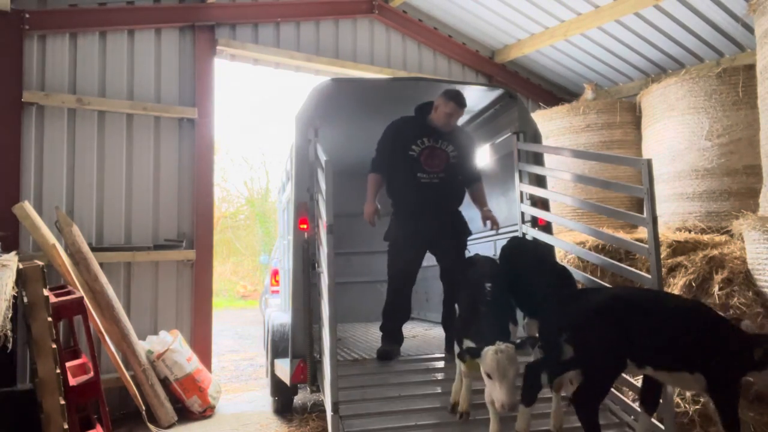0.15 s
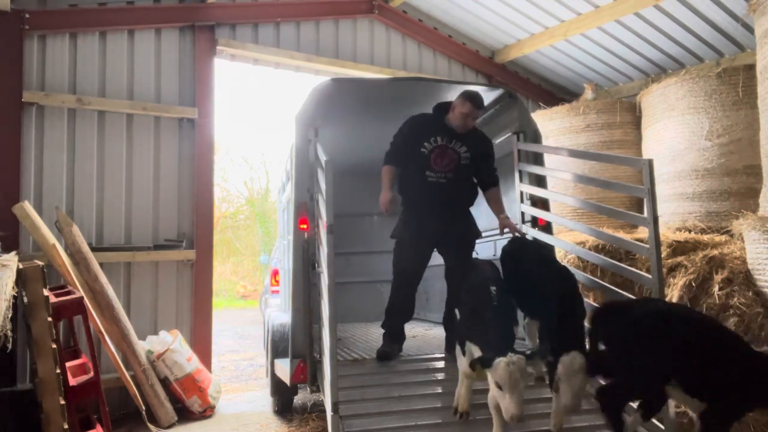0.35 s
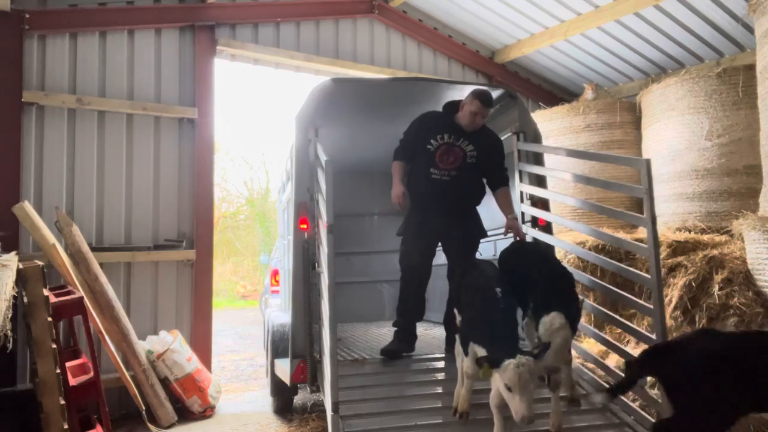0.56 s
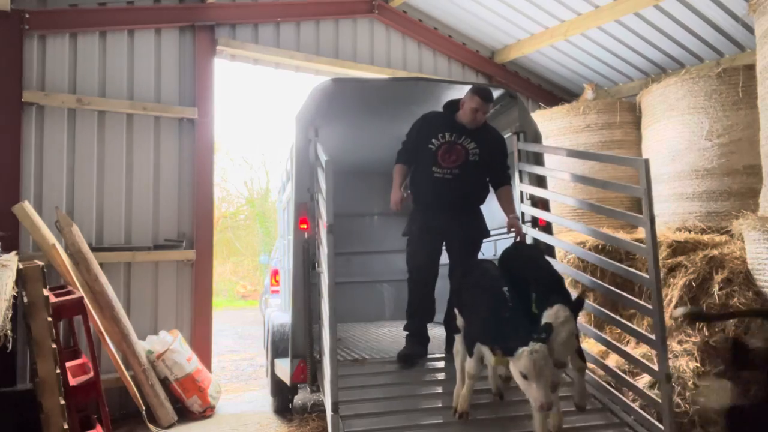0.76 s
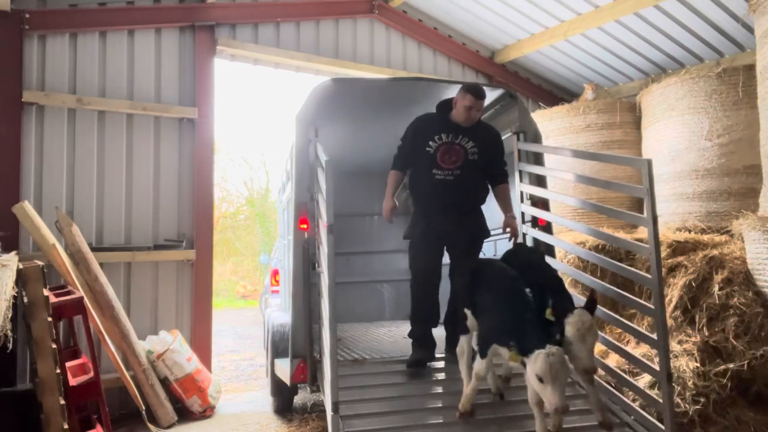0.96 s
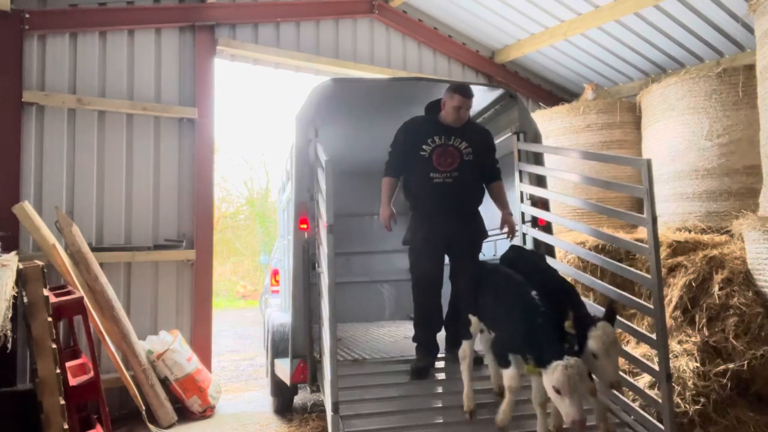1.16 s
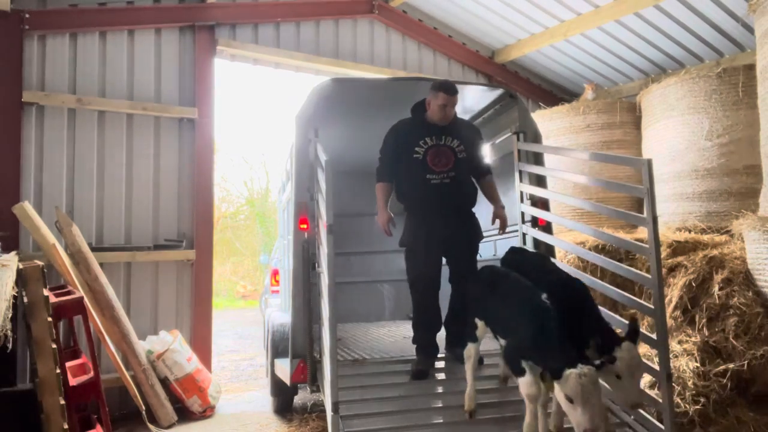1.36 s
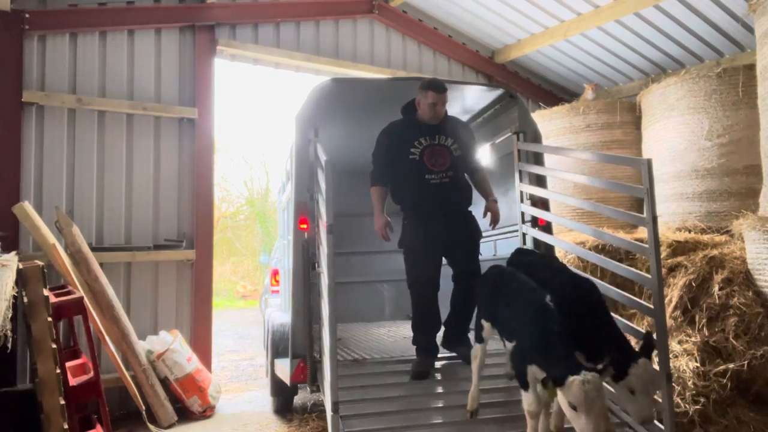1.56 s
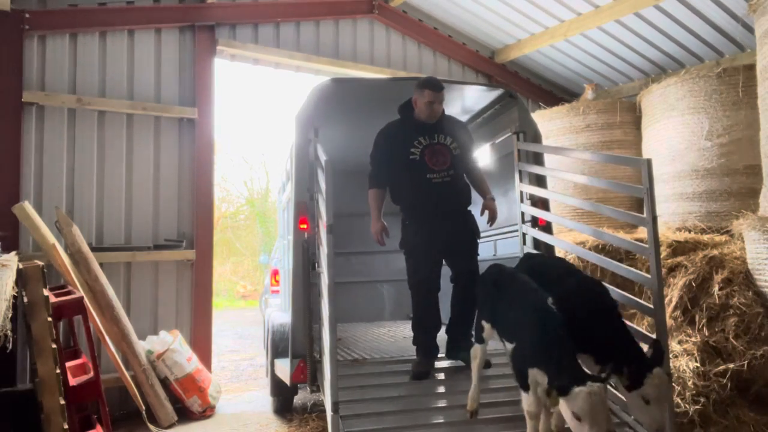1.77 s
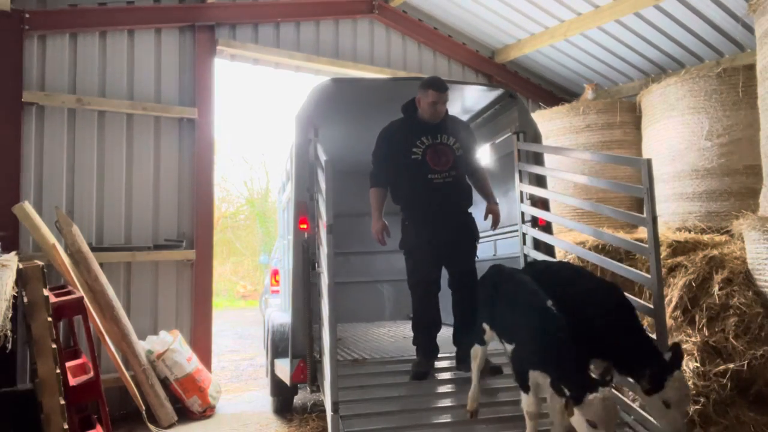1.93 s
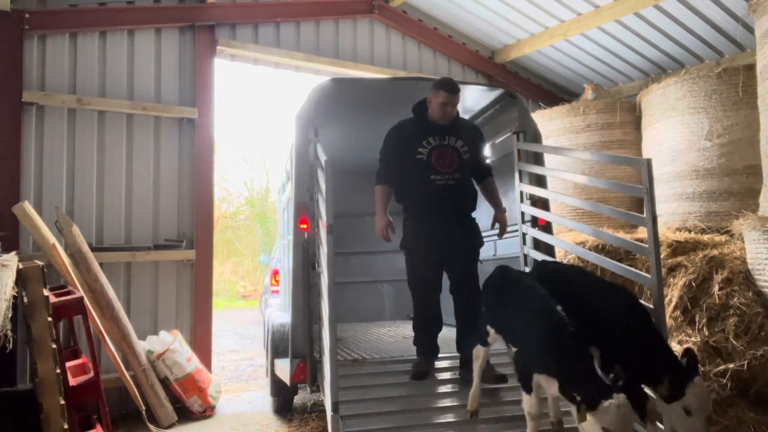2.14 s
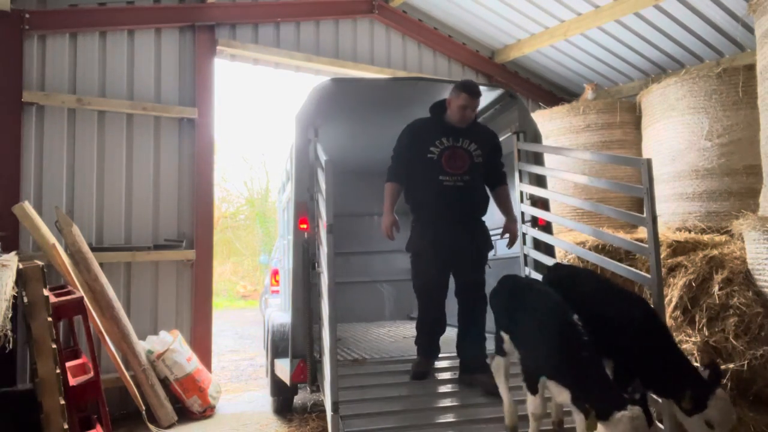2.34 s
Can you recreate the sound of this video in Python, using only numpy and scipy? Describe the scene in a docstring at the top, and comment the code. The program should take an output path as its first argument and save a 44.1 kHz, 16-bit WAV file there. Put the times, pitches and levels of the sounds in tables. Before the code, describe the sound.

Hooves of young cattle thud and scrape down a hollow metal ramp, loose steel clinking

```python
"""At a shed, heard close: calves step down the ribbed metal ramp of a livestock trailer.
Hooves knock as short cracks over ringing modes, skid as showers of tiny slips, snap and screech.
Weight thuds through the deck as low noise and modes, the plate rings, and loose steel ticks and clinks.
The trailer box rumbles and straw swishes as coloured noise, with faint gliding chirps.
Decaying noise tails give the answer of the shed."""
import sys
import numpy as np
from scipy import signal
from scipy.fft import rfft, irfft, next_fast_len
from scipy.io import wavfile
from scipy.ndimage import uniform_filter1d, map_coordinates

SR = 44100
rng = np.random.default_rng(int(sys.argv[2]) if len(sys.argv) > 2 else 0)


def digitize_waveform(pressure):
    """Quantize a signal to 16-bit integers and store it at the path in sys.argv[1].

    Rows of a 2-D input are taken as channels; values are limited to [-1, 1].
    """
    field = np.atleast_2d(pressure).T
    bounded = np.clip(field, -1, 1)
    quanta = np.round(bounded * 32767).astype(np.int16)
    wavfile.write(sys.argv[1], SR, quanta)


N = 110250
T = np.arange(N) / SR  # time in s


def amp(db):
    """Decibels to gain."""
    return 10 ** (np.asarray(db) / 20)


def unit(x):
    """Scale to rms 1."""
    return x / np.sqrt(np.mean(x ** 2) + 1e-20)


def along(points, hz):
    """Read (Hz, value) points on a log frequency axis."""
    f, v = np.transpose(points)
    return np.interp(np.log(hz + 1), np.log(f + 1), v)


def level_curve(points):
    """Gain over time through (s, dB) points."""
    return amp(np.interp(T, *np.transpose(points)))


def filtered(x, response):
    """Multiply the spectrum of x by a function of frequency."""
    m = next_fast_len(N + SR // 4)
    return irfft(rfft(x, m) * response(np.fft.rfftfreq(m, 1 / SR)), m)[..., :N]


def noise(spectrum):
    """Stereo noise of rms 1 with the given colour."""
    white = rng.standard_normal((2, N))
    return unit(filtered(white, lambda f: amp(along(spectrum, f))))


def envelope(rise, hold, t60):
    """Attack, hold and release from time zero, all in seconds."""
    return (1 - np.exp(-T / rise)) * amp(-60 * np.maximum(T - hold, 0) / t60)


def add(track, s, sound, pan_db=0):
    """Mix a sound into a stereo track at time s; positive pan is louder on the left."""
    i = max(round(s * SR), 0)
    placed = amp([[pan_db / 2], [-pan_db / 2]]) * sound
    track[:, i:] += placed[:, :N - i]


def wander(rate_hz):
    """Random curve of rms 1 with a new target rate_hz times a second."""
    return unit(map_coordinates(rng.standard_normal(N), [T * rate_hz], order=1))


def flutter(rate_hz):
    """Random complex gain over half a second that smears a line to about rate_hz wide."""
    knots = rng.standard_normal((2, 4000))
    at = [np.minimum(T[:SR // 2] * rate_hz, 3999)]
    real, imaginary = [unit(map_coordinates(k, at, order=1)) for k in knots]
    return real + 1j * imaginary


def ring(modes, ratio=1, scatter_db=3.0):
    """Damped modes with level and phase a little different at each strike."""
    t = T[:SR // 2]
    out = np.zeros(len(t))
    for hz, db, t60 in modes:
        decay = amp(db + scatter_db * rng.standard_normal() - 60 * t / t60)
        out += decay * np.sin(2 * np.pi * (hz * ratio * t + rng.random()))
    return np.pad(out * (1 - np.exp(-t / 0.00016)), (0, N - len(t)))


def rattle(modes, rough_hz, life=1):
    """Damped modes of a loose part that keeps chattering while it rings."""
    t = T[:SR // 2]
    out = np.zeros(len(t))
    for hz, db, t60 in modes:
        rough_tone = (flutter(rough_hz) * np.exp(2j * np.pi * hz * t)).real
        out += amp(db - 60 * t / (t60 * life)) * rough_tone
    return np.pad(out * (1 - np.exp(-t / 0.002)), (0, N - len(t))) / np.sqrt(2)


def ahead(x, lead_ms):
    """Sound from off centre reaches the left microphone first: a time shift between channels."""
    half_each = np.array([[1], [-1]])
    return filtered(x, lambda f: np.exp(1j * np.pi * f * lead_ms / 1000 * half_each))


def walls(x, count=6):
    """Early copies off the trailer sides give a hollow colour."""
    walls_db, spread_s = -3.5, 0.014
    out = x.copy()
    for u, sign in zip(rng.random(count), rng.choice([-1, 1], count)):
        add(out, 0.002 + u * spread_s, sign * amp(walls_db) / np.sqrt(count) * x)
    return out


def shed(x, wet_db):
    """Add the diffuse answer of the shed, each frequency dying at its own speed."""
    # how long the shed rings: frequency_hz, t60_s
    shed_decay = [(100, 0.78), (400, 0.4), (1200, 0.46), (4000, 0.5), (8000, 0.22), (13000, 0.4)]
    hz, t, z = signal.stft(rng.standard_normal((2, SR * 3 // 4)), SR, nperseg=256)
    decay = amp(-60 * t / along(shed_decay, hz)[:, None])
    tail = signal.istft(z * decay * (1 - np.exp(-t / 0.0021)), SR, nperseg=256)[1]
    echo = signal.fftconvolve(x, tail / np.linalg.norm(tail[0]), axes=1)[:, :N]
    return x + amp(wet_db) * echo


def background():
    """The trailer box rumbles under the shifting weight, as low noise over still air."""
    # colour of the box: frequency_hz, level_db (per Hz)
    box_colour = [(20, -22), (36, -13), (56, -7.5), (73, 5), (92, -10.5), (130, -3), (220, -12.5),
                  (600, -45.5)]
    # rise and fall of the rumble: time_s, level_db
    rumble_level = [(0, -56), (.17, -56), (.33, -55), (.45, -33), (.6, -40), (.72, -32.5), (1.2, -37.5),
                    (1.62, -30), (1.82, -34), (1.95, -32), (2.15, -43), (2.42, -53)]
    # colour of the still air: frequency_hz, level_db (per Hz)
    air_colour = [(15, -29.5), (25, -12), (79, 6.5), (210, -15), (287, 8), (599, -33), (1900, -27.5),
                  (7070, -18), (8270, -11.5), (10200, -18.5), (13300, -20)]
    air_db = -54.5
    return noise(box_colour) * level_curve(rumble_level) + amp(air_db) * noise(air_colour)


def chirps():
    """Thin sine glides with a wavering pitch and a strong echo."""
    # faint chirps: start_s, length_s, start_hz, middle_hz, end_hz, level_db
    chirp_list = [(1.4, 0.024, 4050, 4310, 4470, -44.5), (1.537, 0.024, 3030, 3490, 4500, -44),
                  (1.619, 0.09, 3500, 4230, 3890, -51.5), (1.625, 0.072, 3300, 3620, 3700, -53.5),
                  (1.693, 0.1, 3900, 3130, 2520, -45.5)]
    waver = 0.047  # rms share of the pitch
    out = np.zeros((2, N))
    for s, length, start_hz, middle_hz, end_hz, db in chirp_list:
        u = np.clip(T / length, 0, 1)
        glide = np.polyfit([0, .5, 1], [start_hz, middle_hz, end_hz], 2)
        wobble = unit(uniform_filter1d(rng.standard_normal(N), size=40))
        hz = np.polyval(glide, u) * (1 + waver * wobble)
        add(out, s, amp(db) * np.sin(np.pi * u) * np.sin(2 * np.pi * np.cumsum(hz) / SR))
    return shed(out, wet_db=-2.0)


def straw():
    """Shuffling in the bedding is coloured noise; two grainy swishes swell and fade over it."""
    # colour of the bedding: frequency_hz, level_db (per Hz)
    bedding_colour = [(150, 3), (600, 13.5), (1500, 0), (3000, -12.5), (6000, -15), (11000, -19),
                      (13500, -43)]
    # level of shuffling in straw: time_s, level_db
    shuffle_level = [(0, -52), (.12, -54.5), (.3, -29.5), (1.2, -31.5), (1.5, -38.5), (1.73, -41.5),
                     (2.15, -33), (2.38, -63), (2.5, -51)]
    # straw swishes: peak_s, level_db, width_s
    swish_list = [(1.772, -29, 0.014), (1.921, -29.5, 0.015)]
    # colour of a swish: frequency_hz, level_db (per Hz)
    straw_colour = [(500, -23), (2500, -8), (5000, -11.5), (7500, -8.5), (10500, -3.5), (12500, -3),
                    (13800, 2.5)]
    grain_db, grain_hz = 2.5, 338
    out = noise(bedding_colour) * level_curve(shuffle_level)
    for s, db, width in swish_list:
        crinkle = unit(amp(grain_db * wander(grain_hz)))
        swell = np.exp(-.5 * ((T - s) / width) ** 2)
        out += amp(db) * walls(noise(straw_colour)) * crinkle * swell
    return out


def plate():
    """Steps make the ramp plate ring: separate unsteady notes, each quick to start and sagging a little."""
    # hollow rings under a step: start_s, pitch_hz (before the sag), level_db, hold_s, t60_s
    plate_rings = [(0.142, 436.6, -30.5, 0.026, 0.18), (0.184, 396.5, -26, 0.037, 0.12),
                   (.268, 395.7, -19, 0.015, 0.09), (0.33, 391.6, -15, 0.02, 0.2),
                   (.4075, 162, -11, 0.011, 0.14), (0.473, 432.6, -17.5, 0.03, 0.4),
                   (0.74, 369, -15, .012, .15), (1.521, 270, -15, 0.011, .09),
                   (1.985, 537, -17, .008, 0.11), (2.195, 187, -23.5, 0.011, 0.18),
                   (2.27, 384.8, -29, .008, 0.29)]
    rise_s, rough_share, rough_hz, sag_per_s = 0.0026, 0.362, 68, 0.52
    out = np.zeros((2, N))
    for s, hz, db, hold, t60 in plate_rings:
        unsteady = 1 + rough_share * np.pad(flutter(rough_hz), (0, N - SR // 2))
        phase = 2 * np.pi * np.cumsum(hz * np.exp(-sag_per_s * T)) / SR
        note = (unsteady * np.exp(1j * phase)).real
        add(out, s, amp(db) * note * envelope(rise_s, hold, t60))
    return shed(out, wet_db=-13.5)


def thuds():
    """Each footfall drives the dense low modes of the deck around its own centre; a few ring on."""
    # weight landing on the deck: start_s, level_db, centre_hz, t60_s
    thud_list = [(0.139, -45, 330, 0.31), (.217, -26.5, 293, 0.12), (.275, -23.5, 268, 0.29),
                 (0.332, -26, 260, 1), (.39, -17.5, 210, 0.15), (.407, -13, 212, 0.15),
                 (0.463, -16.5, 335, 0.46), (0.481, -21, 166.5, 0.098), (0.583, -26.5, 328, 0.6),
                 (0.658, -29.5, 250, 1), (0.737, -14, 280, 0.29), (0.755, -19, 198, 0.18),
                 (.835, -20.5, 287, 0.4), (.872, -19, 330, 0.22), (0.979, -25.5, 270, 1),
                 (1.098, -31.5, 318, 0.41), (1.20, -26, 310, 1), (1.372, -26, 165, 0.42),
                 (1.412, -31, 138, 0.65), (1.535, -23.5, 268, 0.3), (1.611, -31, 241, 0.16),
                 (1.896, -30, 248, 0.35), (1.986, -19.5, 480, 0.39), (2.134, -30, 370, 0.12),
                 (2.193, -23.5, 321, 0.35), (2.224, -26.5, 170, 0.11), (2.277, -29, 304.5, 0.28),
                 (2.476, -33, 296, 0.24)]
    # ringing modes of the deck: pitch_hz, level_db, t60_s
    deck_modes = [(140.6, 9.5, 0.2), (181.1, 0, 0.5), (248, -14.5, 0.3), (292, -5.5, 0.45),
                  (400, 3.5, 0.47), (445.5, 1, 0.43), (482, -14.5, 0.17)]
    deck_db, half_width_octaves, rise_s = -9, 0.45, 0.0013
    out = np.zeros((2, N))
    for s, db, hz, t60 in thud_list:
        def bell_db(f):
            """Level around the centre of this thud, cut below 125 Hz."""
            octaves = np.log2((f + 1) / hz)
            bell = -10 * np.log10(1 + (octaves / half_width_octaves) ** 4)
            return bell - 10 * np.log10(1 + (125 / (f + 1)) ** 8)

        white = rng.standard_normal(N)
        band = filtered(white, lambda f: amp(bell_db(f)) / (1 + (f / 1500) ** 2))
        z = signal.hilbert(band)
        power = np.abs(uniform_filter1d(np.abs(z) ** 2, SR // 20))
        body = unit(z.real / np.sqrt(power))  # slow swells of the noise evened out
        modes = ring([(f, level + bell_db(f), life) for f, level, life in deck_modes])
        add(out, s, amp(db) * (body * envelope(rise_s, 0.0047, t60) + amp(deck_db) * modes))
    return shed(out, wet_db=-4.5)


def fittings():
    """Loose steel under the hooves ticks and clinks as rough, damped modes."""
    # a loose fitting ticks: start_s, level_db
    tink_list = [(0.579, -28), (0.653, -20.5), (0.746, -21), (0.824, -19.5), (0.886, -23.5), (0.957, -17.5),
                 (1.093, -26.5)]
    # modes of the fitting: pitch_hz, level_db, t60_s
    fitting_modes = [(4030, 7.3, 0.037), (4380, 1, 0.017), (4506, 0.5, 0.08)]
    # steel strikes steel: start_s, level_db, life (share of the full ring time)
    clink_list = [(0.442, -4.5, 0.86), (0.446, -15, 0.64), (.457, -28.5, 1.7), (.9555, -28.5, 0.51)]
    # modes of the struck steel: pitch_hz, level_db, t60_s (at full life)
    steel_modes = [(3580, -16, 0.12), (5410, -16.5, 0.32), (5740, -15.5, 0.33), (6500, -13, 0.1),
                   (6970, -23.5, 0.083), (7700, -19.5, .1), (11270, -6.5, 0.098), (11820, -11, 0.043),
                   (11950, -9, .08), (11800, -14, .076)]
    out = np.zeros((2, N))
    for s, db in tink_list:
        add(out, s, amp(db) * rattle(fitting_modes, rough_hz=250))
    for s, db, life in clink_list:
        add(out, s, amp(db) * rattle(steel_modes, 427, life), pan_db=-0.5)
    return shed(out, wet_db=-12.5)


def screeches():
    """Stick-slip keeps a few rough modes of the tread sounding while the hoof slides."""
    # a hoof judders along the metal: start_s, level_db, hold_s
    screech_list = [(.388, -30, 0.011), (.403, -28, 0.03)]
    # modes of the tread: pitch_hz, level_db
    tread_modes = [(1600, -2), (1790, -3.5), (2840, -3), (3990, -5)]
    rough_hz, t60_s = 110, 0.14
    out, t = np.zeros((2, N)), T[:SR // 2]
    for s, db, hold in screech_list:
        tone = np.zeros(len(t))
        for hz, level in tread_modes:
            tone += amp(level) * (flutter(rough_hz) * np.exp(2j * np.pi * hz * t)).real
        padded = np.pad(tone, (0, N - len(t)))
        add(out, s, amp(db) * padded * envelope(0.0035, hold, t60_s))
    return shed(out, wet_db=-17.5)


def clips():
    """A bright burst of noise snaps where a hoof edge catches a rib."""
    # hoof edges clip a rib: start_s, level_db
    clip_list = [(0.377, -20), (0.4561, -8.5), (0.644, -21), (0.821, -23), (0.952, -20.5), (1.026, -23.5),
                 (1.175, -24.5)]
    # colour of the snap: frequency_hz, level_db (per Hz)
    snap_colour = [(500, -33.5), (2500, 6.5), (5000, 2), (7500, 0.5), (10000, -3), (12000, -11.5),
                   (13500, -29.5)]
    out = np.zeros((2, N))
    for s, db in clip_list:
        add(out, s, amp(db) * noise(snap_colour) * envelope(0.0026, 0.0047, t60=0.059))
    return shed(out, wet_db=-5.5)


def scrapes():
    """A skid is a shower of tiny slips that also sets the panels and gates ringing."""
    # hooves skidding over the ribs: start_s, level_db, hold_s, t60_s, tilt_db (per octave over 700 Hz), pan_db
    scrape_list = [(0.133, -46, 0.055, 0.24, -2.5, 1), (0.188, -40.5, 0.0083, 0.28, 9.5, 0),
                   (0.381, -23.5, 0.046, 0.14, 4.5, 0.5), (0.452, -15, 0.0055, 0.13, 0, -2),
                   (0.466, -25, 0.029, 0.19, -11, 0), (0.642, -21, 0.0083, 0.28, 0.5, -2.5),
                   (0.73, -24, 0.018, 0.16, 1, 1), (0.814, -19, 0.0067, 0.39, 0, -1.5),
                   (0.878, -20.5, 0.008, 0.36, 1, 0.5), (0.952, -19, 0.021, 0.24, -0.5, 1),
                   (1.024, -18, 0.0063, 0.33, -3.5, -1.5), (1.084, -25.5, 0.02, 0.38, -0.5, 0.5),
                   (1.175, -19, 0.019, 0.33, -3.5, 0.5), (1.367, -30, 0.015, 0.14, -11, -6.5),
                   (1.482, -33, 0.093, 0.3, -11.5, -2), (1.818, -37.5, 0.11, 0.27, -11, -3.5),
                   (2.013, -24, 0.006, 0.12, -8.5, -5), (2.177, -25, 0.0091, 0.12, -8, -1),
                   (2.461, -46, .03, .2, 3.5, -4)]
    # colour of a skid: frequency_hz, level_db (per Hz, before the tilt)
    skid_colour = [(100, -20.5), (350, -1), (900, 7.5), (1400, 6), (1900, 3), (2500, 3), (4200, -2.5),
                   (5500, -10.5), (7700, -14), (11000, -24.5), (13500, -28)]
    # side gates and floor panels: pitch_hz, width_hz, level_db
    panel_modes = [(693, 25, 0), (866, 30, -1), (1027, 30, 0), (1229, 30, 0), (1523, 22, -1),
                   (1787, 30, -1), (2316, 35, -3), (2818, 18, -2)]
    grains_per_s, grain_spread_db, hiss = 700, 3.5, 0.67
    chatter_db, chatter_hz = 2, 130.6  # how unevenly a skid catches on the ribs
    panel_db, rise_s = -2, 0.0013
    out = np.zeros((2, N))
    for s, db, hold, t60, tilt_db, pan_db in scrape_list:
        slip_times = rng.random(N) < grains_per_s / SR
        slip_sizes = amp(grain_spread_db * np.minimum(rng.exponential(size=N), 3))
        slips = slip_times * rng.choice([-1, 1], (2, N)) * slip_sizes
        grit = unit(slips) + hiss * rng.standard_normal((2, N))

        def skid_gain(f):
            """Skid colour with the treble tilted for this skid."""
            return amp(along(skid_colour, f) + tilt_db * np.log2(np.maximum(f, 700) / 700))

        chatter = unit(amp(chatter_db * np.clip(wander(chatter_hz), -2, 2)))
        grit = unit(filtered(grit, skid_gain)) * chatter
        add(out, s, amp(db) * grit * envelope(rise_s, hold, t60), pan_db)

    def panels(f):
        """Summed resonances of the panels."""
        return sum(amp(db) * 1j * f * w / (c * c - f * f + 1j * f * w) for c, w, db in panel_modes)

    return shed(out + amp(panel_db) * filtered(out, panels), wet_db=-5.5)


def knocks():
    """Horn on tread: a short noise crack and a hollow clop of damped modes."""
    # hard hoof strikes: start_s, level_db, crack_db (on top of level_db), pitch_ratio,
    # lead_ms (of the left microphone), echo_db
    knock_list = [(.198, -31.5, -13, 1, 0.037, 0.5), (0.2618, -17.5, -2.5, 0.95, 0.23, -4.5),
                  (.330, -13, -5.5, 0.93, 0.17, -1.5), (.449, -18, -14, 0.93, 0.13, -1.5),
                  (.466, -16.5, -18, 1.1, 0.15, 2), (.834, -17.5, -10, 1.1, 0.062, -6.5),
                  (.959, -25, -10, 0.95, 0.039, -14), (.981, -22, -6, 1.6, 0.058, -3),
                  (1.180, -28, 3, .95, 0.23, -8), (1.225, -27, -14, 1.1, .1, -2),
                  (1.398, -27, -28, 0.57, .1, 5.5), (1.487, -31.5, -23, 1.2, 0.17, 5),
                  (1.548, -33.5, -16, 0.78, 0.11, -5), (1.974, -26.5, -6, 1, 0.19, -4),
                  (1.9817, -8.5, -11.5, 1.03, 0.097, -11), (1.9865, -9, -13, 0.97, 0.17, -3.5),
                  (2.182, -27.5, -7.5, 0.74, 0.26, 2), (2.4665, -28, -10.5, 1.095, 0.25, 3.5),
                  (2.474, -30.5, -14, 1.08, 0.22, -3.5)]
    # modes of the hoof: pitch_hz (before the ratio), level_db (before the scatter), t60_s
    hoof_modes = [(559, -19, 0.053), (669, -13, 0.095), (786, -4, 0.083), (877, -1, 0.048),
                  (984, -.5, 0.03), (1133, 1, 0.032), (1337, -5, 0.047), (2306, -12, .035)]
    # colour of the crack: frequency_hz, level_db (per Hz)
    crack_colour = [(200, -24), (900, 12), (1700, -1), (2400, 7.5), (4500, 2), (7500, -0.5), (11000, -5.5),
                    (13500, -14.5)]
    out = np.zeros((2, N))
    for s, db, crack_db, ratio, lead_ms, echo_db in knock_list:
        clop = ring(hoof_modes, ratio)
        crack = noise(crack_colour) * envelope(0.00097, 0.0011, t60=0.041)
        blow = np.zeros((2, N))
        add(blow, s, clop + amp(crack_db) * crack)
        out += amp(db) * shed(ahead(blow, lead_ms), echo_db)
    return out


def scene():
    """All sources together; hoof and fitting sounds are 2 dB louder on the right."""
    ramp = walls(scrapes()) + knocks() + clips() + screeches() + fittings()
    ramp = ramp * amp([[-1], [1]])
    return background() + chirps() + straw() + plate() + thuds() + ramp


def record(dry):
    """Close microphones: near-mono bass, a dip near 9 kHz, clipping and a band limit."""
    # stereo width by frequency: frequency_hz, side_db
    width_colour = [(20, -49), (420, -58.5), (540, -43.5), (850, -7), (1350, -2.5), (1900, 7), (2600, 3),
                    (5500, 2.5), (8500, 11), (11500, -4), (13000, 5.5)]
    # the sound widens as the calves move off to the side: time_s, side_db
    spread_level = [(0, -2.5), (.5, -3.5), (1.7, -4.5), (2.1, 0), (2.35, -2)]
    # overall tone colour: frequency_hz, level_db
    tone_colour = [(20, -2.5), (8000, -2), (8700, -15.5), (9200, -14.5), (9800, -2.5), (11500, 1),
                   (12800, -2), (13600, -9)]
    top_hz = 13700
    mid = (dry[0] + dry[1]) / 2
    side = filtered((dry[0] - dry[1]) / 2, lambda f: amp(along(width_colour, f)))
    side = side * level_curve(spread_level)
    pair = filtered(np.array([mid + side, mid - side]), lambda f: amp(along(tone_colour, f)))
    return filtered(np.clip(pair, -.95, .95), lambda f: f < top_hz)


dry = scene()
out = record(dry)
digitize_waveform(out)
```